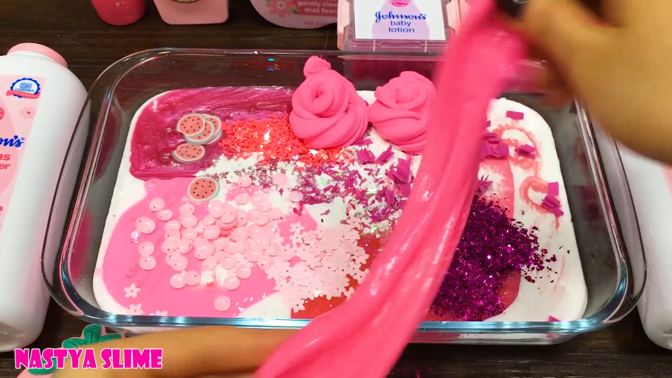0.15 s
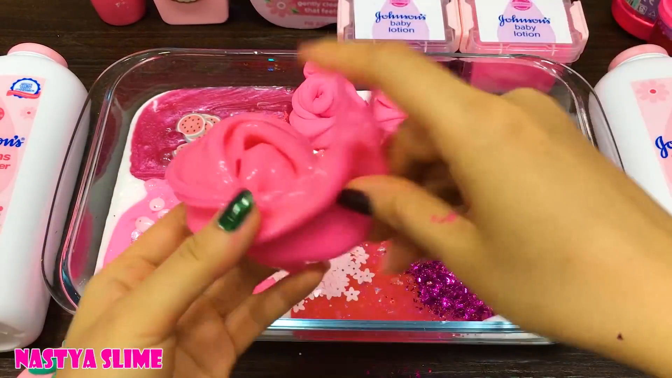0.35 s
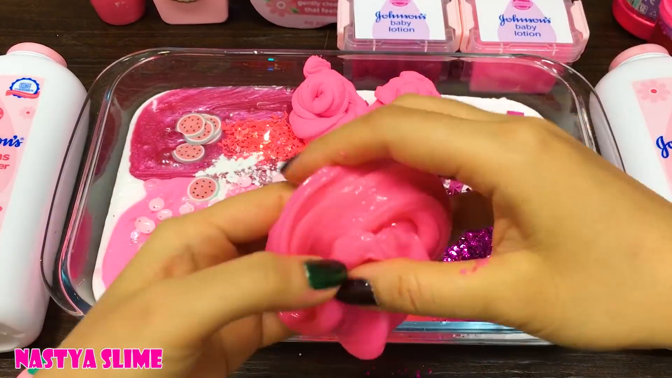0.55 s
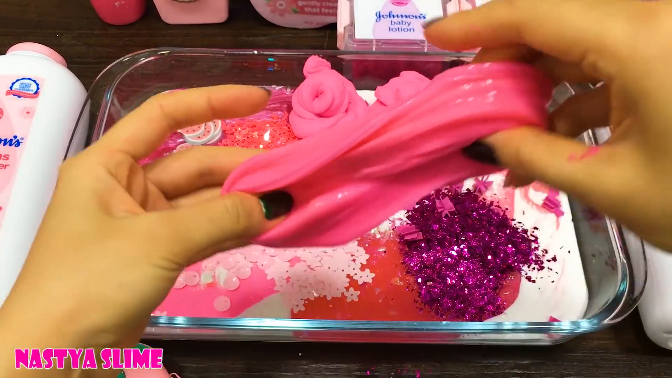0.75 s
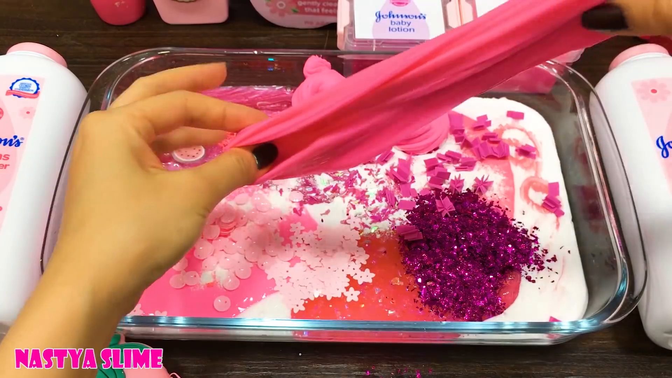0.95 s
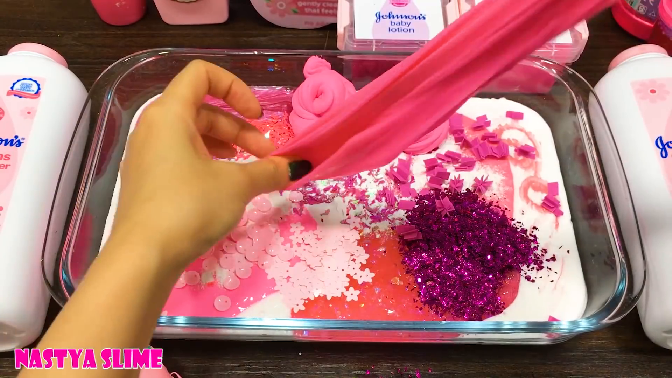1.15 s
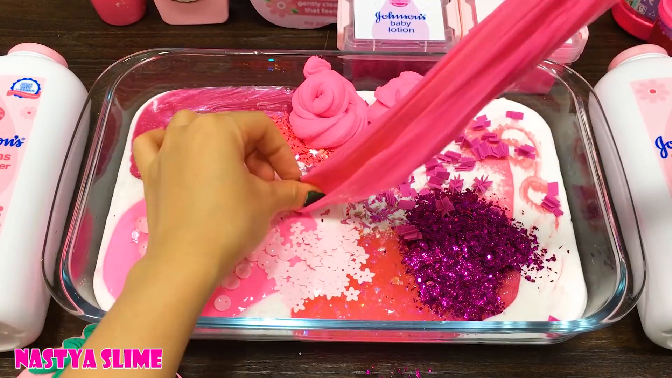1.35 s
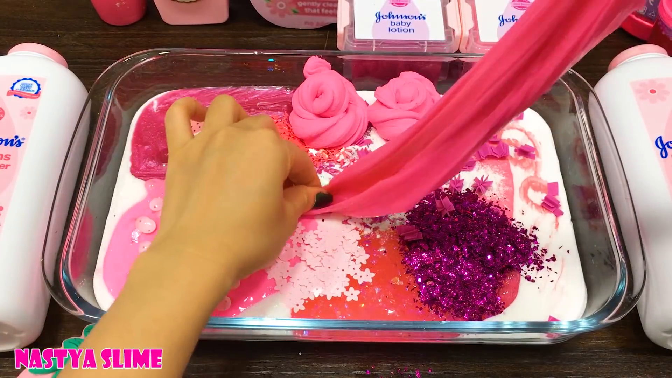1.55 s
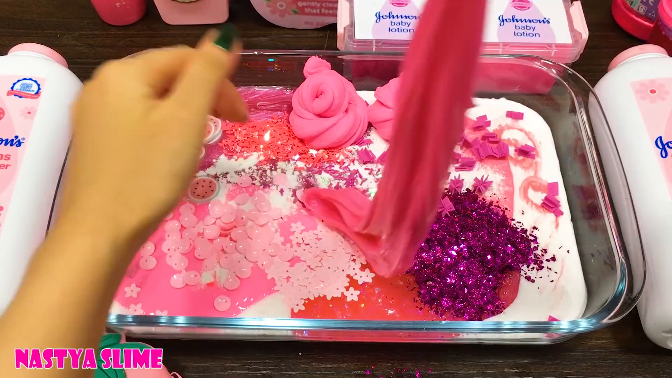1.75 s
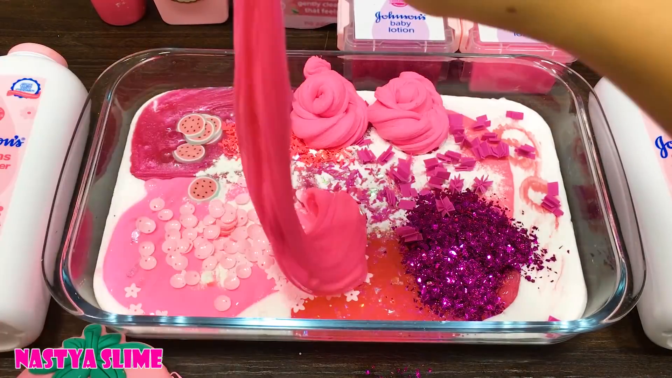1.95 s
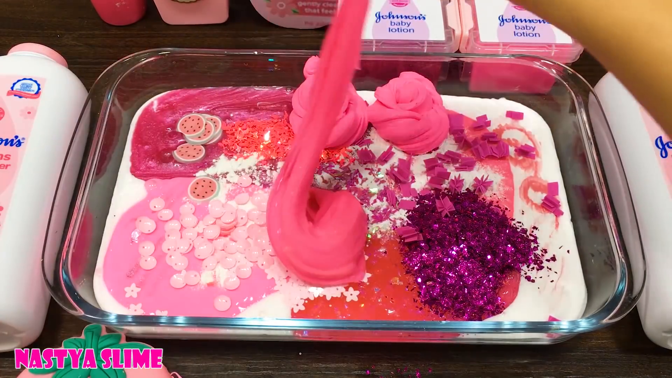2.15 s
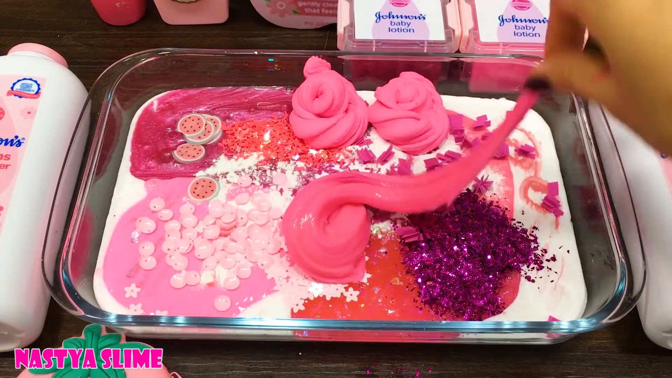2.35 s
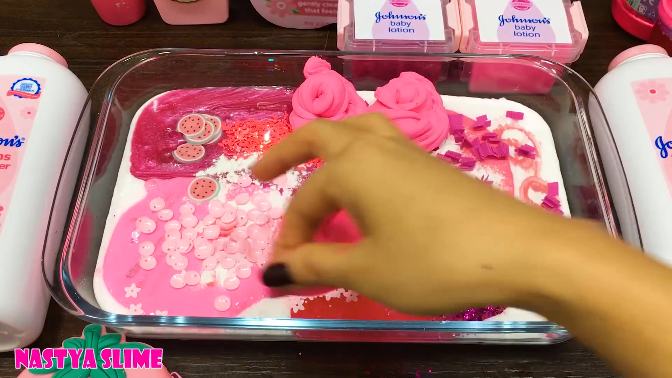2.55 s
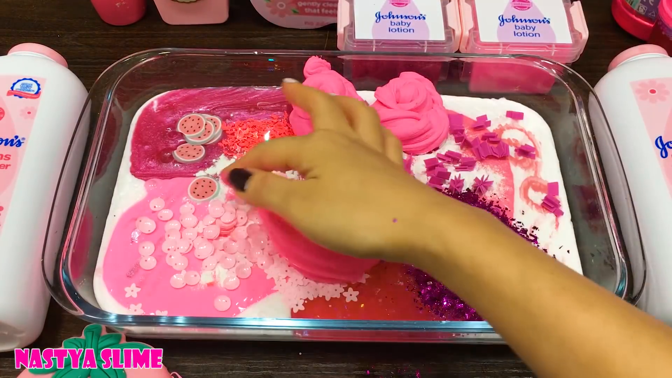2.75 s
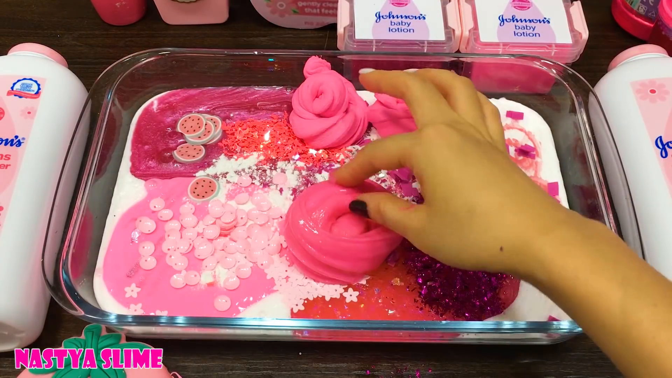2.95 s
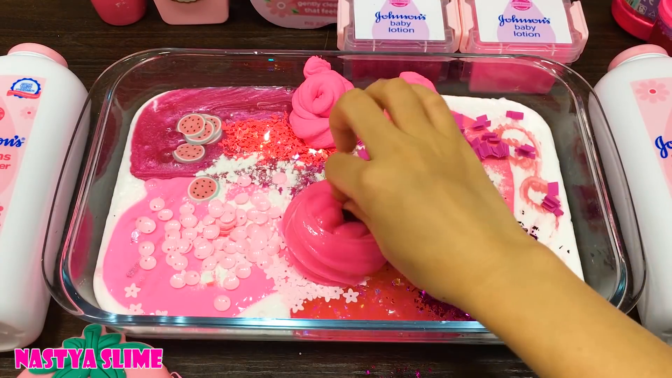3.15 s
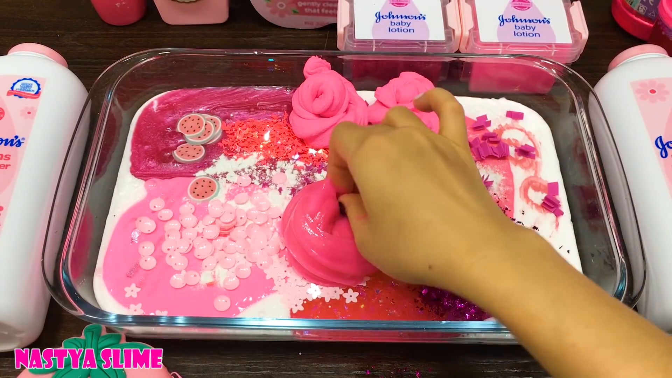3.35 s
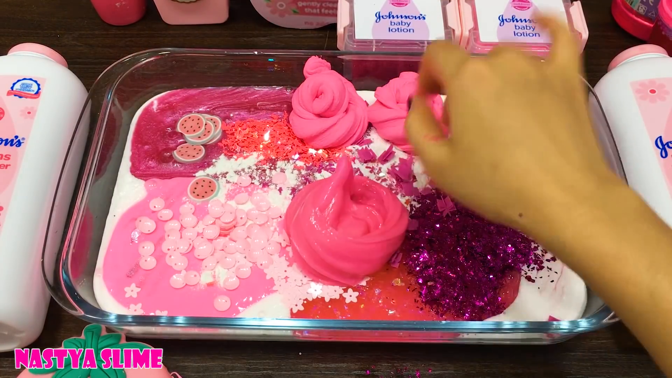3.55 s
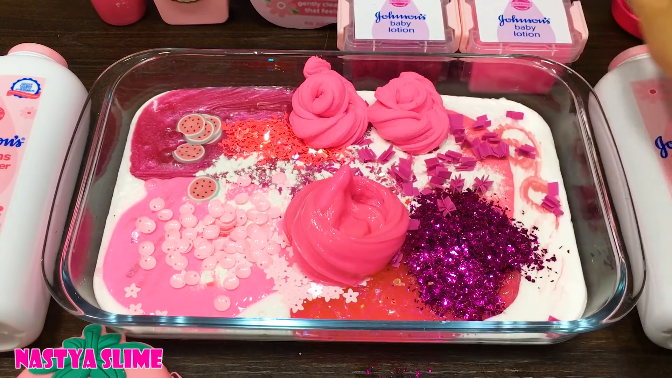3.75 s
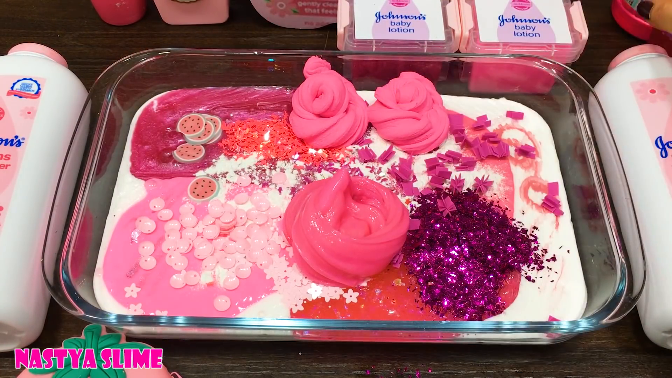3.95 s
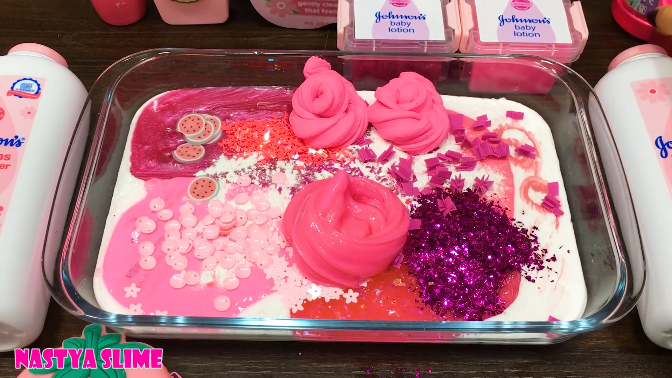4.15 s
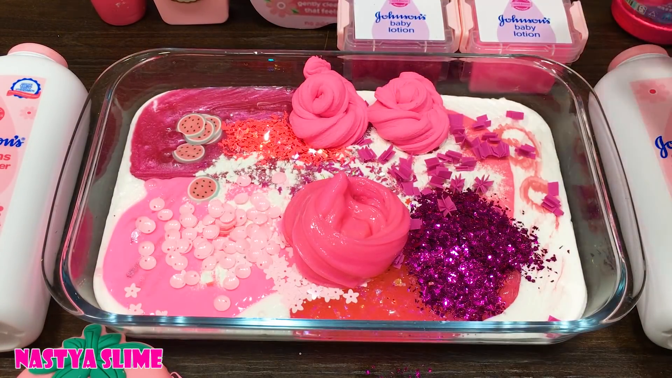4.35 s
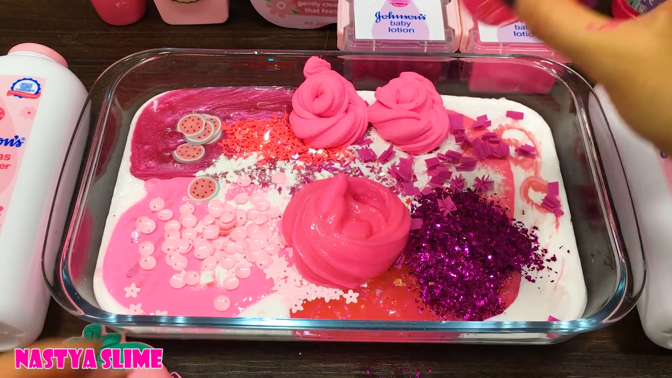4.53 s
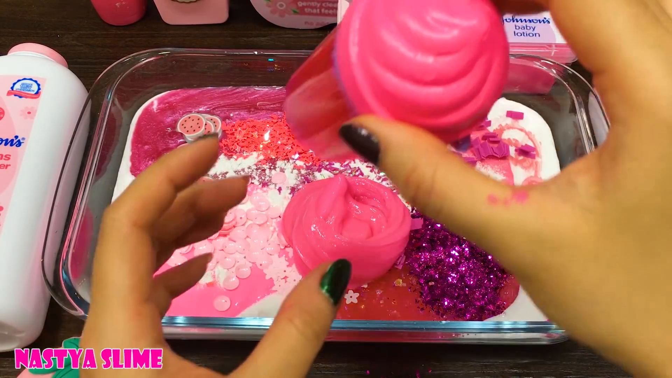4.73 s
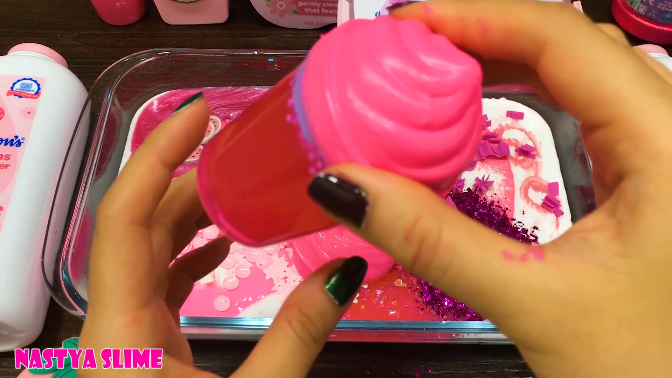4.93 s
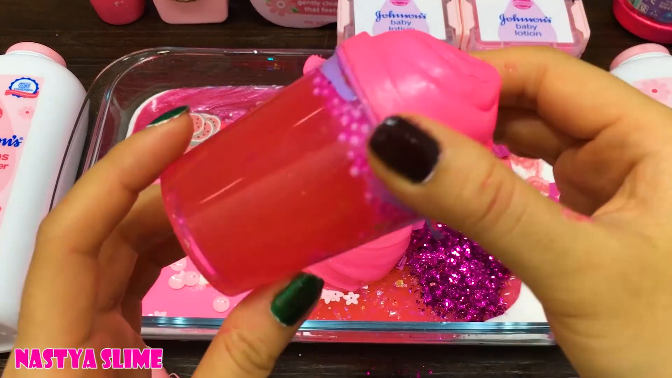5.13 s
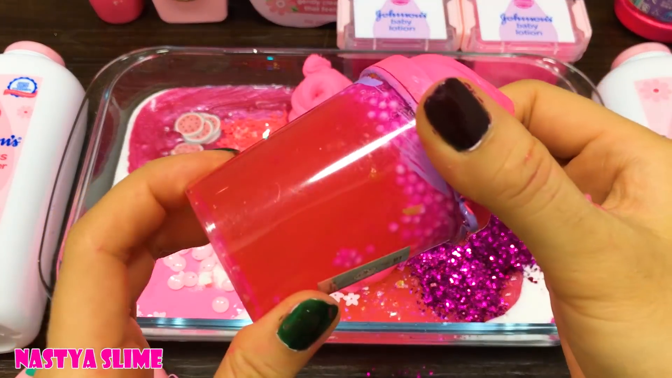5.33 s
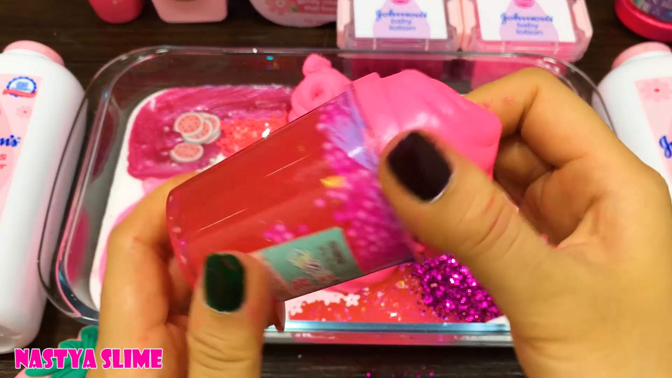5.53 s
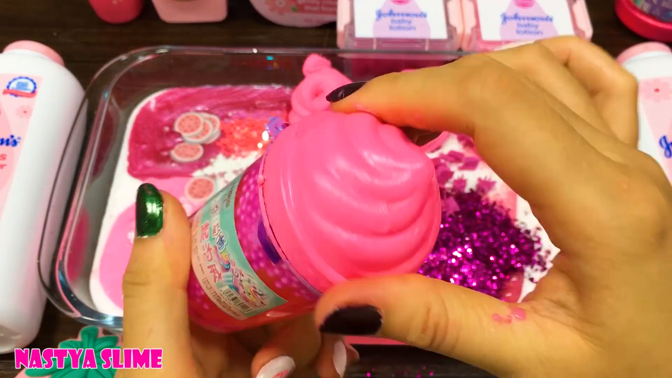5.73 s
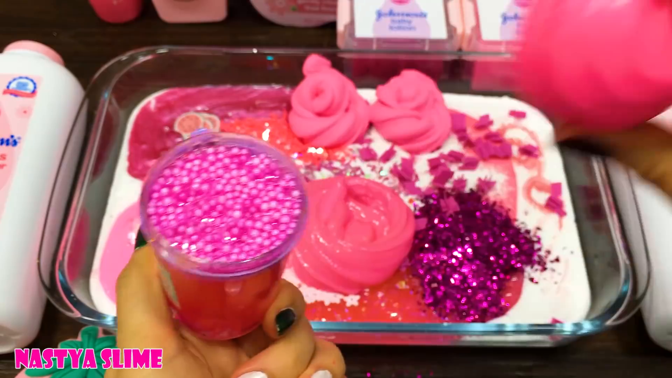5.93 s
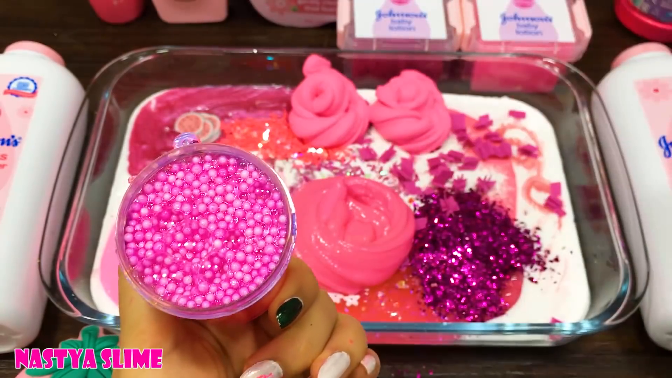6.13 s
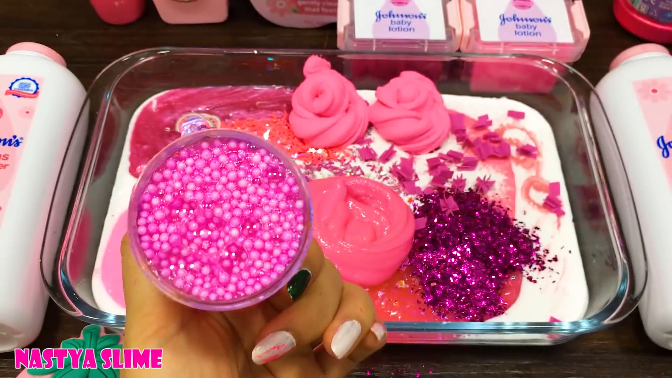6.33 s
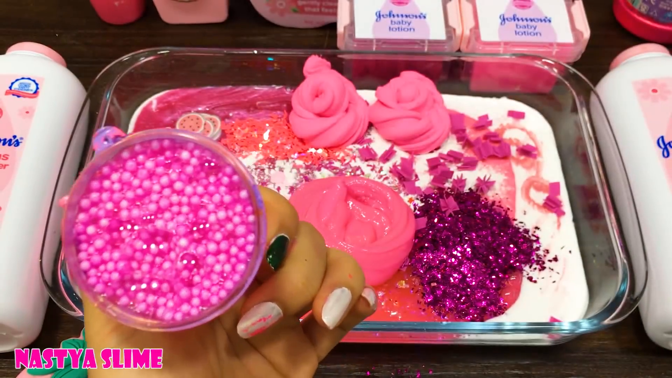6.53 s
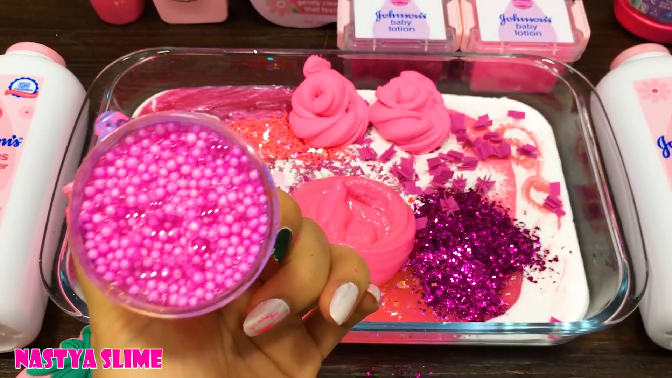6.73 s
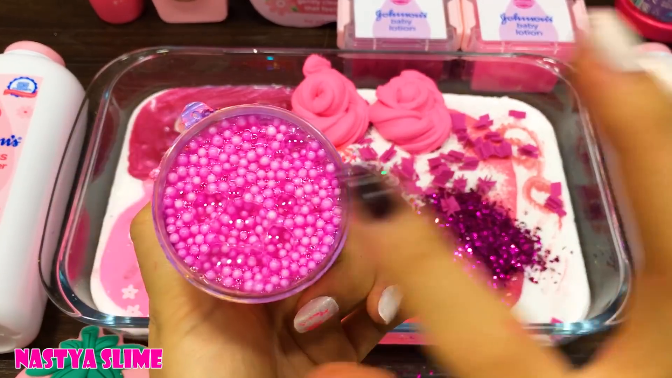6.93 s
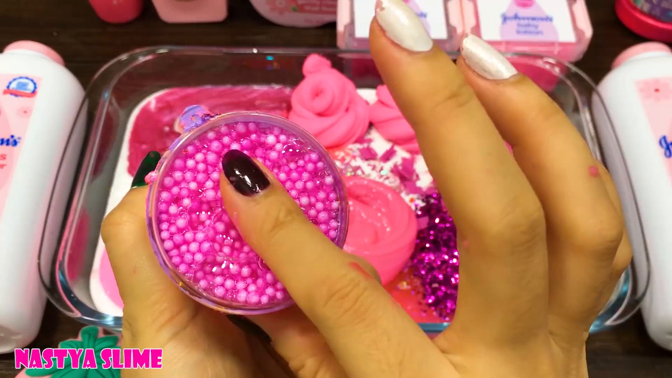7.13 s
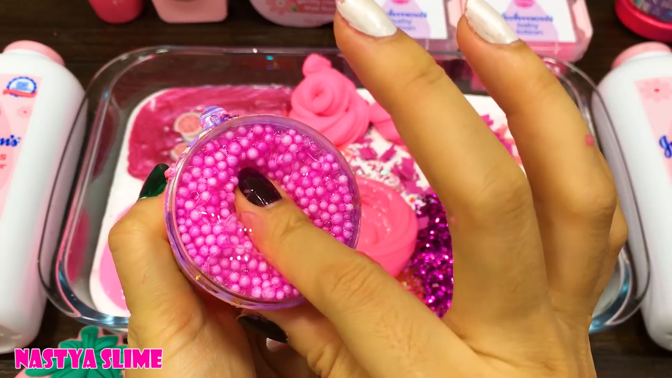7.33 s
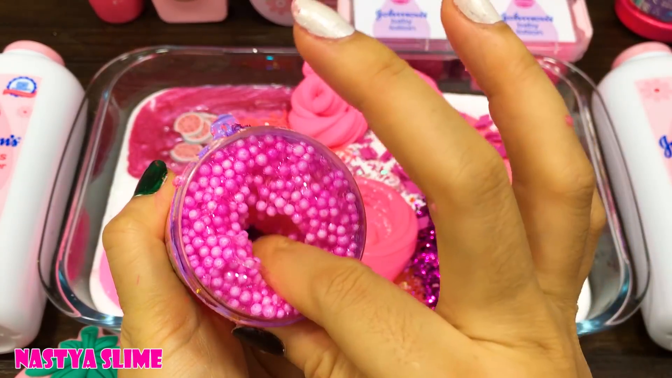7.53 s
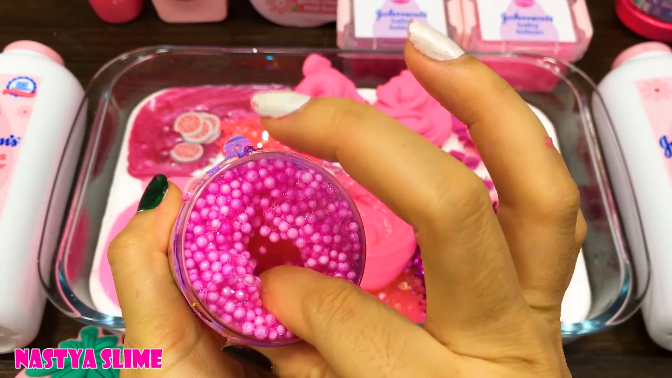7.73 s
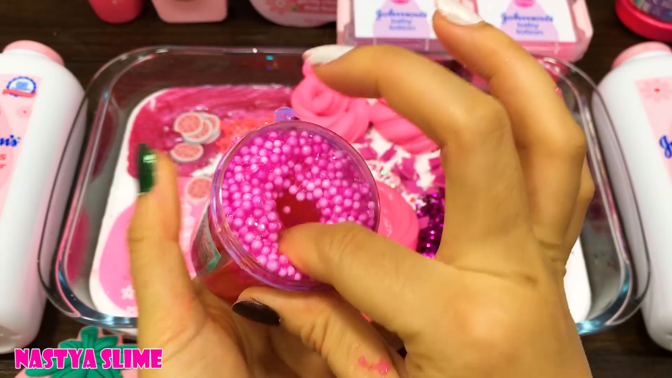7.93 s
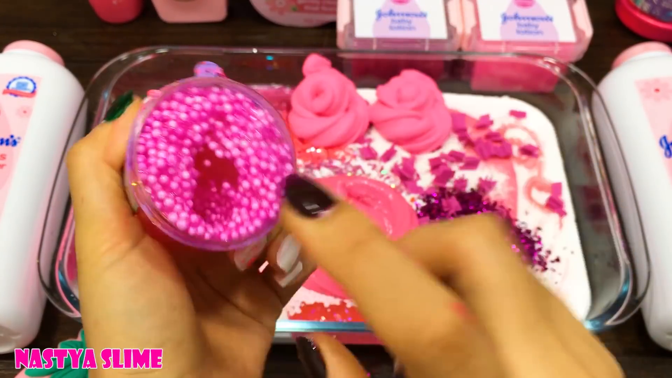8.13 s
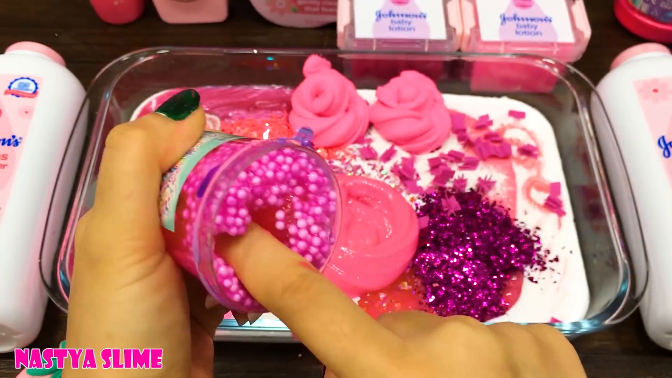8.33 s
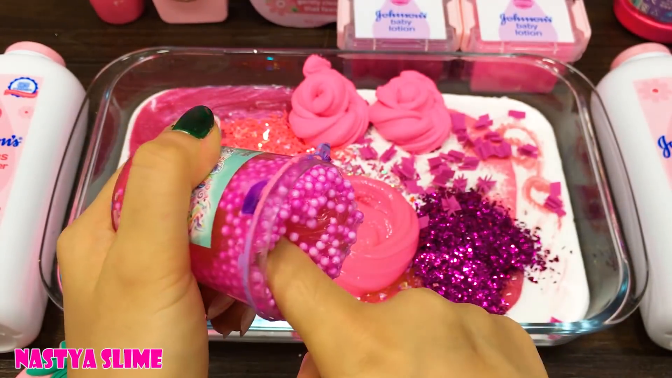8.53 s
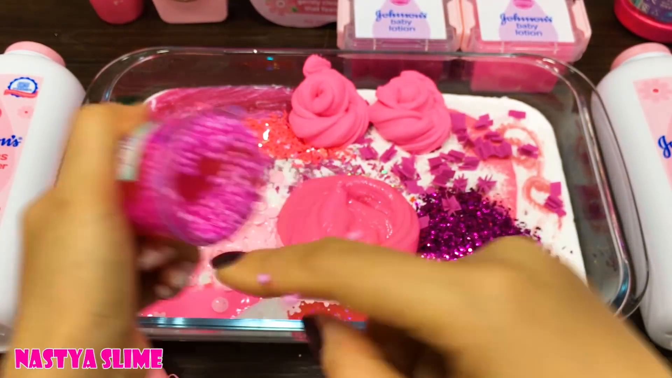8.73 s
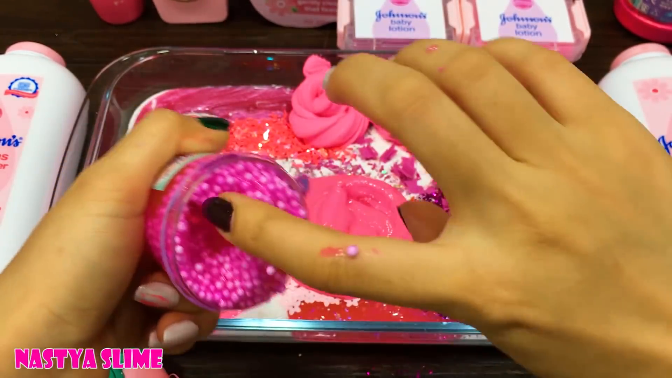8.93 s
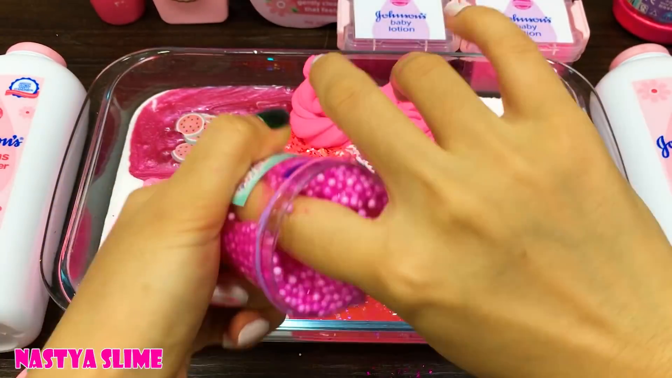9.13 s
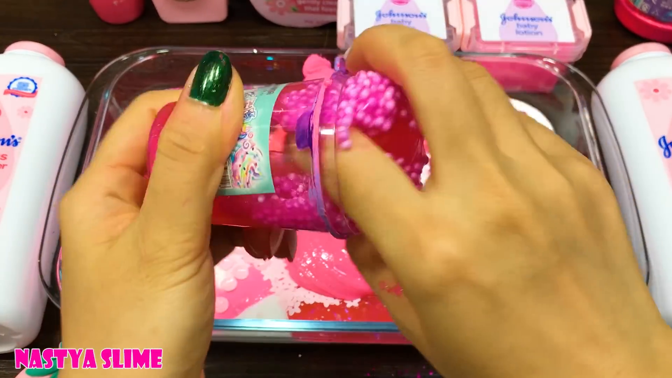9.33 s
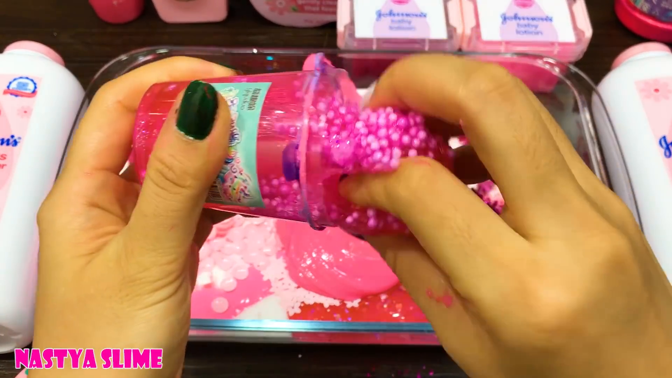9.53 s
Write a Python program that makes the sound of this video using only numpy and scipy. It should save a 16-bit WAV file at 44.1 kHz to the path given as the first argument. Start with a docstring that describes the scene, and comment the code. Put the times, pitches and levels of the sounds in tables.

```python
"""Trapped air pockets burst as dry pops while hands stretch sticky slime, peel a clay cap off a plastic cup
and poke the beaded slime inside, close to a microphone. Each pop is a snap of noise that rings its pocket.
Under the pops, swarms of tiny bursts make a tearing crackle, sliding resonances of noise make wet squelches,
and the cup plops, scrapes and rings. The room is small and soft, built from sparse echoes; behind it lie
low traffic rumble and faint far engine drones, made from noise and sines, and microphone hiss."""
import sys
import numpy as np
from scipy import signal
from scipy.fft import rfft, irfft, next_fast_len
from scipy.io import wavfile
from scipy.ndimage import uniform_filter1d

SR = 44100
rng = np.random.default_rng(int(sys.argv[2]) if len(sys.argv) > 2 else 0)


def volts(x):
    """Linear amplitude factor 10**(x/20) for a level x in dB, scalar or array-like."""
    e = np.asarray(x, float) / 20
    return 10 ** e


def store_pcm(level_fs):
    """Save levels as 16-bit WAV."""
    pcm = np.round(np.clip(level_fs, -1, 1) * 32767).astype(np.int16)
    wavfile.write(sys.argv[1], SR, np.atleast_2d(pcm).T)


N = 422470  # length in samples

# Colour of the traffic rumble. Each row: pitch in Hz, relative level in dB per Hz.
RUMBLE_COLOUR = [(30, -46), (45, -18.5), (56, -2.5), (63, 1.5), (70, -1), (78, -0.5), (88, -1.5),
                 (98, -7.5), (113, -8.5), (138, -8.5), (163, -16), (198, -14), (238, -20.5), (373, -22),
                 (677, -32), (1500, -44.5), (3000, -72.5)]
# Rise and fall of the rumble, before a small common lift. Each row: time in seconds, level in dB.
RUMBLE_LEVEL = [(0, -56.5), (1, -56.5), (2.6, -57), (3.4, -56.5), (3.9, -55.5), (5, -59), (5.4, -56.5),
                (6.3, -56), (7.2, -56), (8, -57.5), (8.4, -57.5), (8.7, -55.5), (9.58, -56.5)]
# Far engines fading in and out, before a small common lift.
# Each row: start in seconds, end in seconds, start pitch in Hz, end pitch in Hz, level in dB.
ENGINE_DRONES = [(0, 0.25, 189.5, 170, -65.5), (.55, 0.934, 120, 340, -66.5), (1.25, 1.7, 206, 205.7, -66),
                 (2.3, 2.847, 206, 205, -65.5), (1.6, 3, 171.6, 170.9, -67.5), (1.3, 2.8, 383.4, 420, -75),
                 (3.003, 4.153, 380, 368.3, -69.5), (6.3, 7.7, 198.3, 203.6, -68.5)]
# How fast the room's echoes die. Each row: pitch in Hz, time to fall by 60 dB in seconds.
ROOM_DECAY = [(500, 0.18), (2000, 0.2), (6000, 0.19), (12000, 0.15)]
# Colour of the microphone hiss. Each row: pitch in Hz, relative level in dB per Hz.
HISS_COLOUR = [(300, -44), (600, -5), (1700, -7.5), (4000, -10), (10000, -13), (16000, -16.5)]
# Overall colour of the sound, with a steep treble edge near 15.8 kHz. Each row: pitch in Hz, gain in dB.
OVERALL_COLOUR = [(25, -5), (55, -0.5), (5600, 0), (6350, -2.5), (7200, 0.5), (9200, 0.5), (10000, -0.5),
                  (11500, 1), (13500, 0), (14800, -3.5), (15750, 6), (15950, -30), (17000, -16)]
# Ringing air and wall of the cup.
# Each row: pitch in Hz, relative level in dB, time to fall by 60 dB in seconds.
CUP_RINGS = [(149, -11.5, 0.32), (248, -16, 0.18), (300, -14.5, 0.23), (348, -10.5, 0.19), (401, -23, 0.21)]
# Suction letting go of the cup, and soft bumps of the hands.
# Each row: time in seconds, peak level in dB, pitch in Hz, length in ms.
PLOPS_AND_BUMPS = [(6.1245, -18, 270, 2.63), (5.699, -36.5, 460, 1.8), (6.725, -44, 520, 5.8),
                   (2.81, -47.5, 95, 34), (3.15, -44.5, 76, 75), (9.15, -45.5, 66, 78)]
# Clay cap peeling off the cup. Each row: time in seconds, crackle level in dB,
# level in dB of the drag over the rim that shakes the cup wall.
CAP_PEEL = [(5.76, -72, -75), (5.779, -36.5, -48.5), (5.813, -45, -52), (5.92, -48, -55.5),
            (6.0, -50.5, -54.5), (6.062, -53, -64), (6.106, -54.5, -70), (6.129, -48.5, -42),
            (6.152, -66.5, -69), (6.27, -77, -85)]
# Air squeezed through a wet gap that widens or narrows.
# Each row: start in seconds, end in seconds, start pitch in Hz, end pitch in Hz, level in dB.
WET_GAPS = [(0.266, 0.321, 1990, 1790, -67), (0.388, 0.48, 3400, 2970, -71),
            (0.607, 0.677, 5500, 5300, -65), (0.89, 0.932, 1500, 1180, -54.5),
            (3.65, 3.697, 1090, 1150, -67), (3.791, 3.823, 1170, 1130, -62.5),
            (5.773, 5.867, 4600, 4500, -51.5), (5.86, 5.965, 1230, 1190, -58),
            (6.043, 6.103, 4500, 4500, -63), (6.087, 6.12, 1600, 1200, -63.5),
            (6.129, 6.216, 2600, 2320, -64), (6.718, 6.788, 1540, 1840, -59.5),
            (6.806, 6.892, 1930, 1640, -71), (6.896, 6.955, 1430, 1400, -61.5),
            (7.69, 7.85, 2180, 2080, -71), (7.721, 8.034, 1100, 1250, -73), (8.569, 8.674, 3130, 3600, -51),
            (8.688, 8.783, 4200, 3200, -66), (8.975, 9.04, 596, 500, -61.5),
            (8.978, 9.044, 1130, 2350, -49.5), (8.981, 9.03, 8550, 9300, -50),
            (8.985, 9.032, 2420, 6600, -48.5), (9.34, 9.425, 2280, 2830, -56.5),
            (9.34, 9.395, 1240, 1200, -60), (9.43, 9.472, 2700, 2200, -58),
            (9.473, 9.568, 1680, 840, -54.5)]
# Air hissing in under the lifting cap or round the finger. Each row: start in seconds, end in seconds.
LEAKING_AIR = [(5.79, 6.04), (8.97, 9.8), (9.34, 9.41)]
# Slime tearing off skin, plastic or beads. Each row: loudest moment in seconds, crackle level in dB,
# ms to swell by 20 dB, ms to fade by 20 dB, finest bubbles over middle ones in dB.
SLIME_TEARS = [(0.005, -63, 101, 250, -2), (0.074, -63.5, 150, 130, 4), (0.16, -69, 300.5, 298, 3),
               (0.294, -59.5, 180, 35, -0.5), (0.341, -64, 36, 48, -6), (0.4, -60, 25, 60, -6),
               (0.44, -53, 59.5, 40, -3.5), (0.575, -63, 14.5, 80, -3), (0.629, -59, 79.5, 79.5, -9),
               (0.672, -55, 100.5, 31.5, 0), (0.77, -65.5, 248.5, 80, 2), (0.897, -55.5, 48, 100, -0.5),
               (0.969, -58, 30, 35.5, 2), (1.07, -60.5, 70, 219.5, -1), (1.211, -61.5, 129.5, 106, 3.5),
               (1.375, -63, 77, 45.5, -4), (1.473, -51, 29, 60, 4), (1.78, -67, 190.5, 56, 3),
               (1.836, -53.5, 70, 33, 0.5), (1.884, -58, 20.5, 22, 2), (1.922, -61, 34.5, 29, 8),
               (2.097, -68.5, 129.5, 55, 3), (2.185, -74, 69, 599.5, -3), (2.854, -71.5, 799.5, 111.5, 0),
               (3.384, -74, 99.5, 504, -1), (3.662, -51.5, 17, 12, 3), (3.69, -71.5, 129, 133, 0),
               (3.779, -56, 25, 81, 1.5), (4.282, -69.5, 65, 80, -1), (4.366, -64, 12, 60.5, -8),
               (5.703, -62.5, 23, 100.5, -3), (6.359, -66, 19, 42, -1), (7.323, -72, 69, 201, 6.5),
               (7.455, -54.5, 17, 134, -9), (7.57, -45, 13, 9, -14), (7.594, -40, 9, 20.5, -14),
               (7.615, -54, 11.5, 158, -7), (7.731, -41.5, 118, 196.5, 3.5), (8.013, -52.5, 500, 62, -14.5),
               (8.172, -66, 101.5, 86, 2), (8.248, -52, 12.5, 150, -9), (8.328, -43.5, 66, 12.5, 5),
               (8.35, -69, 13, 171, 16), (8.5, -62, 14, 399, 4), (8.596, -35.5, 41.5, 43, 6.5),
               (8.625, -48, 20.5, 151.5, -9), (8.69, -50, 100, 200, 6), (8.785, -55, 201.5, 146, -2),
               (8.982, -43.5, 22, 79.5, 1), (9.009, -39.5, 40, 29, 1), (9.05, -65.5, 28, 109.5, 4),
               (9.263, -51, 16, 24, 8), (9.315, -62, 39, 31, 6), (9.351, -35, 23, 83, 6),
               (9.487, -48.5, 138.5, 140, -7), (9.579, -53, 129.5, 100, 8)]
# Hollow pockets in the crackle, stage by stage. Each row: start of the stage in seconds,
# their level over the crackle in dB.
HOLLOW_STAGES = [(0, -8), (1.15, -12.5), (3.3, -9), (5.6, 2), (5.75, -4), (7.4, -16.5), (8.1, -5.5),
                 (8.48, -14), (8.75, -5), (9.2, -11.5), (9.42, -8.5)]
# Hollow pockets, middle bubbles and finest bubbles. Each row: low edge in Hz, high edge in Hz.
BUBBLE_BANDS = [(950, 3900), (3500, 9450), (9000, 16300)]
# Single pops that stand out, loud or faint. Each row: time in seconds, peak level in dB, pocket ring in Hz,
# dull part of the snap in dB within the pop, length of tearing in ms.
SINGLE_POPS = [(0.0687, -44.5, 1290, -8, 5.6), (0.179, -45, 7150, -11, 0.55), (0.3, -42, 6890, 5, 1.6),
               (0.4342, -38, 9970, -14, 1.4), (0.6704, -40, 10850, 5, 2.5), (0.9321, -44, 14300, -14, 1.6),
               (0.9726, -52, 10770, 0, 1.6), (1.0273, -42, 15160, 0, 0.8), (1.0566, -34.5, 8200, 1, 0.3),
               (1.0776, -42, 15500, -18, 0.3), (1.228, -46, 7280, -19, 0.7),
               (1.3722, -43.5, 4200, -12, 1.6), (1.4378, -45, 14210, -13, 0.9),
               (1.4671, -33, 12320, -28.5, 2.9), (1.47, -37, 9220, -18, 2.2), (1.5091, -44, 4570, -22, 3.2),
               (1.551, -45, 10590, -16, 1.0), (1.8403, -40, 8200, -18, 1.34), (1.8799, -37, 14990, -9, 2.3),
               (1.919, -39, 8700, -2, 0.92), (1.932, -43, 8750, -16, 1.0), (2.1001, -54, 15420, -10, 1.9),
               (2.4031, -53, 3270, -5, 2.0), (2.8361, -49, 12400, -17, 1.0), (3.4134, -54, 8530, -3, 1.6),
               (3.6607, -44, 1070, -19, 3.5), (3.8518, -40, 8300, 0, 1.6), (3.9993, -56, 2240, -4, 1.3),
               (5.6677, -51, 7900, -8, 1.7), (5.6811, -41, 11800, -20, 1.0), (5.698, -15, 1270, -14, 1.36),
               (5.7191, -37, 1450, -13, 1.5), (5.7741, -12.5, 12300, 3, 2.8), (5.784, -28, 12140, -6, 1.3),
               (5.8263, -19, 14560, -20, 1.1), (6.006, -32, 1050, -5, 1.5), (6.0244, -34, 8950, -6, 1.1),
               (6.051, -35, 1090, -14, 2.3), (6.123, -19.5, 1120, -11, 1.5), (6.1293, -19, 2200, -31, 7),
               (6.141, -23, 14990, -5, 1.6), (6.356, -46, 9990, -31, 2.8), (6.4714, -48, 10080, -13, 1.6),
               (6.532, -44.5, 2970, -10, 1.5), (7.3197, -44, 8100, -12, 1.7),
               (7.436, -33.5, 8160, -31, 0.3), (7.4803, -35, 10500, -24, 1.6),
               (7.501, -36, 11710, -21, 0.3), (7.5256, -31, 11530, -16, 1.9),
               (7.5303, -26.5, 7800, -27, 0.3), (7.5561, -40, 12660, -18, 0.5),
               (7.5675, -13.5, 14700, -10, 0.3), (7.5743, -18, 12100, -8, 0.2),
               (7.5876, -17, 14640, -2, 0.2), (7.592, -14, 4800, -7.5, 0.7), (7.5975, -17, 3200, -11, 0.3),
               (7.6205, -27, 14640, -1, 1.7), (7.6376, -34, 7580, -9, 0.4),
               (7.6487, -25.5, 7650, -12, 0.23), (7.663, -29.5, 7450, 1, 1.1),
               (7.686, -22, 12230, -26, 0.2), (7.698, -27, 11800, -21, 2.7), (7.705, -25, 11460, -14, 3),
               (7.7105, -19, 12490, -13, 0.3), (7.714, -18, 11710, -20, 0.4),
               (7.7234, -24, 12320, -20, 1.5), (7.7299, -21, 7540, -33, 1.0),
               (7.7355, -28, 12660, -21, 2.2), (7.7497, -29, 11110, -26, 1.3),
               (7.7682, -12, 12400, -34, 0.4), (7.777, -33, 8010, -17, 0.4),
               (7.796, -21.5, 7240, -12, 0.17), (7.8518, -27, 14990, -21, 0.5),
               (7.8605, -25, 7500, -30, 0.1), (7.883, -29, 12660, -11, 2.8), (7.8859, -27, 7490, -30, 0.2),
               (7.8944, -27.5, 7600, -8.5, 1.3), (7.902, -29, 4680, -23, 0.26),
               (7.923, -18.5, 14500, -17, 0.24), (7.967, -30.5, 7400, -25, 0.5),
               (7.9843, -27, 14560, -15, 0.22), (7.9963, -27, 7540, -18, 0.5), (8.012, -30, 7700, -7, 2.6),
               (8.3062, -34, 2004, -12, 3.6), (8.3098, -29, 15330, -3, 1.8), (8.3293, -26.5, 3030, 13, 4.8),
               (8.4971, -25.5, 3200, -23, 0.42), (8.51, -24.5, 9300, -14, 0.2),
               (8.5152, -39, 8700, -16, 0.2), (8.5249, -43.5, 11460, -18.5, 1.0),
               (8.5346, -35, 10850, -19, 0.2), (8.5538, -25.5, 11800, -2, 0.3),
               (8.564, -31, 12490, -22, 0.4), (8.5782, -27, 9990, -26, 1), (8.5867, -17, 10800, -23, 2.5),
               (8.597, -9.5, 7500, -26, 0.97), (8.6263, -35, 5080, -26, 0.6), (8.636, -23, 3830, -10, 0.47),
               (8.655, -37, 7670, -8, 1.1), (8.689, -13, 3760, -12, 0.49), (8.7872, -24, 2600, -6, 0.4),
               (8.7954, -38, 12400, -16, 0.8), (8.8647, -26, 12400, -17, 0.2),
               (9.0213, -24, 11970, -5, 1.2), (9.2589, -27, 12580, -12, 0.7),
               (9.2624, -30.5, 11630, -7, 0.8), (9.29, -37, 12400, -23, 0.2), (9.305, -34, 11710, -2, 0.8),
               (9.312, -30, 14380, -10, 0.3), (9.3168, -30, 12230, -22, 0.2),
               (9.3228, -34, 12830, -21, 0.2), (9.3396, -15, 11460, -22, 0.3),
               (9.3494, -23, 10600, -17, 1.7), (9.3744, -15, 14560, -8, 0.74), (9.39, -23, 7700, -22, 1.5),
               (9.4043, -22.5, 9820, -18, 0.3), (9.4139, -29, 2510, 8, 2.3), (9.4243, -28.5, 2850, 0, 1.8),
               (9.4373, -28, 8270, -11, 0.9), (9.4442, -35, 4050, -7, 1.5), (9.462, -26.5, 2120, -4, 4.1),
               (9.4997, -21, 12000, -6, 2.4), (9.5616, -26.5, 14300, -19, 0.1)]
# Pockets buried in the slime or deep in the cup, their treble muffled. Each row: time in seconds,
# peak level in dB, ring in Hz, dull part of the snap in dB within the pop, length of tearing in ms.
BURIED_POPS = [(0.6316, -36, 5750, -17, 1.4), (3.3808, -38, 3860, -11, 1.1),
               (3.7964, -35.5, 6300, -20, 1.05), (4.36, -41.5, 2100, -6, 1.6),
               (6.7198, -27.5, 1620, -35, 0.62), (6.8375, -53, 1830, -25, 1.2),
               (6.851, -55, 1800, -25, 1.2), (6.8645, -46.5, 1610, -20, 2), (6.9015, -38.5, 1370, -27, 3.3),
               (7.4491, -7.5, 6900, -16.5, 0.33), (7.4504, -21, 6040, -21, 1.2),
               (8.1272, -54, 1890, -2, 1.4), (8.1665, -38, 1050, -15, 1.3), (8.2513, -37, 7800, -17, 0.6),
               (8.2689, -43, 4910, -12, 2), (8.282, -26.5, 2840, 3.5, 2.4), (8.6064, -21.5, 5150, -11, 1.1),
               (8.8158, -31, 1480, -11.5, 2.1), (9.5585, -36, 2380, 6, 1.7)]


def evened(x):
    """Scales a sound to an rms (average strength) of 1."""
    return x / np.sqrt(np.mean(x ** 2) + 1e-20)


def read(points, hz):
    """Reads a table of values by pitch, on a log-frequency axis."""
    f, value = np.transpose(points)
    return np.interp(np.log(hz + 1), np.log(f + 1), value)


def along(rows):
    """Spreads the columns of a timed table over every sample."""
    s, *columns = np.transpose(rows)
    return [np.interp(np.arange(N) / SR, s, c) for c in columns]


def add(mix, s, sound):
    """Mixes a sound in at time s, in seconds."""
    part = mix[round(s * SR):][:len(sound)]
    part += sound[:len(part)]


def band(x, lo_hz, hi_hz):
    """Band-pass filter: keeps what lies between two pitches."""
    return signal.sosfilt(signal.butter(3, [lo_hz, hi_hz], "bandpass", fs=SR, output="sos"), x)


def resonate(x, hz, width_hz):
    """Shifts the pitch hz down to zero, smooths, and shifts back: a resonance of gain 1 that can slide."""
    turn = np.exp(2j * np.pi * np.cumsum(hz * np.ones(len(x))) / SR)
    r = np.exp(-np.pi * width_hz / SR)
    smoothed = signal.lfilter([1 - r], [1, -r], x / turn)
    return 2 * (turn * smoothed).real


def coloured(spectrum):
    """Steady noise of the given spectrum, at rms 1."""
    hz = np.fft.rfftfreq(N, 1 / SR)
    shaped = rfft(rng.standard_normal(N)) * volts(read(spectrum, hz))
    return evened(irfft(shaped, N))


def traffic():
    """Low-pitched noise rumbles through the walls; gliding, wavering sines are the engine drones."""
    out = volts(along(RUMBLE_LEVEL)[0] + 0.96) * coloured(RUMBLE_COLOUR)
    for start, end, from_hz, to_hz, db in ENGINE_DRONES:
        count = round((end - start) * SR)
        waver_hz = 1.83 * evened(uniform_filter1d(rng.standard_normal(count), 4000))
        turns = np.cumsum(np.linspace(from_hz, to_hz, count) + waver_hz) / SR
        fades = signal.windows.tukey(count, .6)
        add(out, start, volts(db + 1.5) * np.sin(2 * np.pi * turns) * fades)
    return out


def room(x):
    """Sparse echoes of random sign after 4 ms, each band dying at its own speed."""
    taps = np.zeros(SR // 2)
    at = np.arange(180, len(taps) - 20, 20)
    taps[at + rng.integers(0, 20, len(at))] = rng.choice([-1., 1.], len(at))
    hz, t, z = signal.stft(taps, SR, nperseg=256)
    decay = volts(-60 * t / read(ROOM_DECAY, hz)[:, None])
    tail = signal.istft(z * decay, SR, nperseg=256)[1]
    return signal.oaconvolve(x, tail / np.linalg.norm(tail))[:N]


def cup():
    """The cap drags in lumps, suction lets go with low plops, hands bump the table; the cup rings on."""
    push = np.zeros(N)
    for s, db, hz, ms in PLOPS_AND_BUMPS:
        u = np.arange(-2 * ms, 2 * ms, 1000 / SR) / 1000  # seconds from the middle
        swell = np.exp(-(u * 1500 / ms) ** 2)
        add(push, s + u[0], volts(db) * swell * np.sin(2 * np.pi * hz * u + 2.0))
    t = np.arange(SR // 2) / SR
    ring = sum(volts(db - 60 * t / t60) * np.sin(2 * np.pi * hz * t) for hz, db, t60 in CUP_RINGS)
    ringing = volts(-48.5) * signal.oaconvolve(push, ring)[:N]

    s = np.arange(N) / SR
    dragging = (s > CAP_PEEL[0][0]) & (s < CAP_PEEL[-1][0])
    lumps = volts(5.4 * evened(uniform_filter1d(rng.standard_normal(N), 200)))
    scrape = evened(band(lumps * rng.standard_normal(N), 163, 830))
    drag = dragging * volts(along(CAP_PEEL)[1]) * scrape
    return push + ringing + drag


def squelches():
    """Sputtering air, as uneven noise, takes its colour from a gap whose pitch slides."""
    out = np.zeros(N)
    for start, end, from_hz, to_hz, db in WET_GAPS:
        count = round((end - start) * SR)
        air, sputter = rng.standard_normal((2, 16000))[:, :count]
        air = air * volts(3.0 * evened(uniform_filter1d(sputter, 130)))  # 3 dB of sputter
        hz = np.geomspace(from_hz, to_hz, count)
        width_hz = 400 + .08 * hz.mean()
        u = np.linspace(0, 1, count)
        swell = evened(np.minimum(u / 0.12, 1) * (1 - u) ** 1.1)  # quick start, slow fade
        tone = resonate(resonate(air, hz, width_hz), hz, width_hz)
        add(out, start, volts(db) * evened(tone) * swell)
    return out


def tearing():
    """Level and share of finest bubbles of all tears and the peeling cap, summed by power, each millisecond."""
    settling_db = -83  # slime at rest still ticks faintly
    cap_fine_db = -2.5  # finest bubbles over middle ones as the cap peels
    rounded = 1.35  # a tear lingers near its loudest: above 1 rounds the top of its swell and fade
    t = np.arange(0, N / SR, 1 / 1000)
    s, db, swell_ms, fade_ms, fine_db = np.transpose(SLIME_TEARS)[:, :, None]
    away = np.maximum(1000 * (s - t) / swell_ms, 1000 * (t - s) / fade_ms)
    power = volts(2 * (db - 20 * away ** rounded))
    cap_s, cap_db, _ = np.transpose(CAP_PEEL)
    cap_power = volts(2 * np.interp(t, cap_s, cap_db, -200, -200))  # silent before and after the peel
    total = power.sum(0) + cap_power + volts(2 * settling_db)
    fine = ((power * fine_db).sum(0) + cap_power * cap_fine_db) / total
    return t, 10 * np.log10(total), fine


def crackle():
    """Swarms of tiny bursts, each ringing at its own size; the pull decides which bubble sizes speak."""
    per_s, spread_db, grain_ms = 3500, 6.0, 0.32  # bursts per second, loudness spread, decay of a burst
    level_db, fine_db = along(np.transpose(tearing()))
    s = np.arange(N) / SR
    stage_s, stage_db = np.transpose(HOLLOW_STAGES)
    hollow_db = stage_db[np.maximum(np.searchsorted(stage_s, s) - 1, 0)]

    size = volts(spread_db * np.minimum(rng.exponential(1, N), 4)) * (rng.random(N) < per_s / SR)
    kind = rng.integers(0, 24, N)
    t = np.arange(256) / SR
    snaps = rng.standard_normal((24, 256)) * np.exp(-t * 1000 / grain_ms)
    pitches = np.linspace(1100, 15000, len(snaps))
    # each grain is a ringing bubble plus some of its plain snap
    grains = [evened(resonate(g, hz, 500 + 0.15 * hz)) + 0.33 * evened(g) for g, hz in zip(snaps, pitches)]
    swarm = evened(sum(signal.oaconvolve(size * (kind == k), g)[:N] for k, g in enumerate(grains)))

    leak = sum((s > start) & (s < end) for start, end in LEAKING_AIR)
    # threads too fine to tell apart, and leaking air
    hiss = np.where(leak, .8, 0.53) * rng.standard_normal(N)
    swarm = swarm * np.where(leak, .6, 1) + hiss
    fine = 1 / (1 + volts(-2 * fine_db))  # power share of the finest bubbles
    shares = volts(hollow_db), np.sqrt(1 - fine), np.sqrt(fine)
    return volts(level_db) * sum(w * evened(band(swarm, *edges)) for w, edges in zip(shares, BUBBLE_BANDS))


def small_pops():
    """Rows like those of SINGLE_POPS, drawn at random where the slime tears, louder where it tears louder."""
    count, crowding = 170, .35  # crowding: how strongly louder tearing gathers the pops
    over_db, spread_db = 13.5, 4.5  # usual peak over the crackle, and its scatter
    low_hz, high_hz = 4500, 14800
    short_ms, long_ms = .2, 2.6
    t, level_db, _ = tearing()
    # no small pockets burst while air streams in
    sealed = 1 - sum((t > start) & (t < end) for start, end in LEAKING_AIR)
    crowd = np.cumsum(sealed * (volts(crowding * level_db) - volts(crowding * level_db.min())))
    place, size, length = rng.random((count, 3)).T
    loud, dull = rng.standard_normal((count, 2)).T
    s = np.interp((np.arange(count) + place) / count * crowd[-1], crowd, t)
    db = np.interp(s, t, level_db) + over_db + spread_db * loud
    hz = low_hz + (high_hz - low_hz) * size
    dull_db = -16.5 + 4.2 * dull
    ms = short_ms + (long_ms - short_ms) * length ** 1.3  # short ones are commoner
    return np.transpose([s, db, hz, dull_db, ms])


def pops():
    """A film snaps, shreds on for up to a few milliseconds, and rings the pocket it closed."""
    out, t = np.zeros(N), np.arange(512) / SR
    s, db, hz, dull_db, ms = np.vstack([BURIED_POPS, SINGLE_POPS, small_pops()]).T[:, :, None]
    bright_db = -7 + 3 * np.log2(hz / 8000)  # deeper pockets snap duller, by 3 dB an octave
    bright_db[:len(BURIED_POPS)] = -29  # muffled

    shreds = rng.standard_normal((len(s), 512)) * np.exp(-t * 1000 / (.75 * ms))
    # short pops are nearly one clean snap
    drive = np.clip(ms - .3, .15, 1.2) * shreds / np.sqrt(ms * SR / 2000)
    drive[:, 0] = 1  # the snap itself
    dull = volts(dull_db) * band(drive, 950, 5360)
    for k in range(len(s)):
        ring = drive[k]
        for _ in range(3):  # three passes give steep skirts
            ring = resonate(ring, hz[k], 800 + hz[k, 0] / 2.55)
        # the bright snap starts at about half the ring's pitch, within limits
        bright = band(drive[k], np.clip(0.49 * hz[k, 0], 5230, 12000), 16300)
        pop = ring + dull[k] + volts(bright_db[k]) * bright
        add(out, s[k, 0], volts(db[k]) * pop / abs(pop).max())
    return out


def scene():
    """Slime and cup near the microphone, the echoes of the pops, and the street."""
    bursts = pops()
    near = crackle() + squelches() + cup()
    echoes = volts(-20.0) * room(bursts)
    return (bursts + near + echoes + traffic())[None]


def roll_off(x):
    """The treble ends steeply here."""
    return signal.sosfilt(signal.butter(12, 16980, fs=SR, output="sos"), x)


def record(dry):
    """The microphone adds its hiss, then an overall colour is laid on everything."""
    size = next_fast_len(N + SR)
    hissing = dry + volts(-71) * coloured(HISS_COLOUR)
    colour = volts(read(OVERALL_COLOUR, np.fft.rfftfreq(size, 1 / SR)))
    heard = irfft(rfft(hissing, size) * colour, size)[:, :N]
    return roll_off(heard)


dry = scene()
out = record(dry)
store_pcm(out)
```